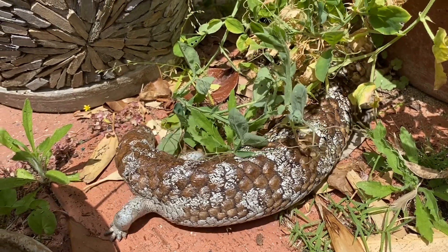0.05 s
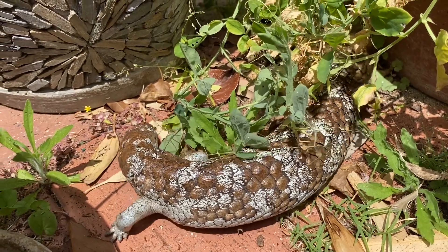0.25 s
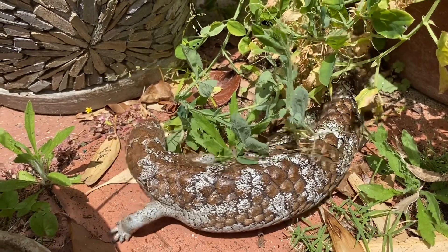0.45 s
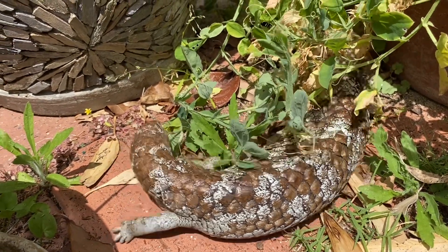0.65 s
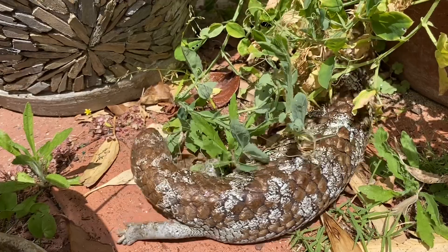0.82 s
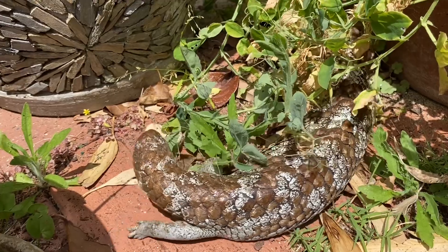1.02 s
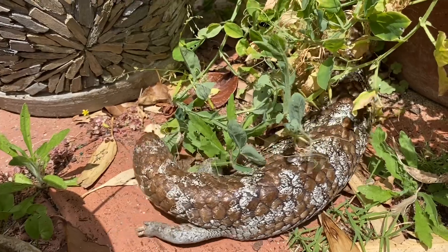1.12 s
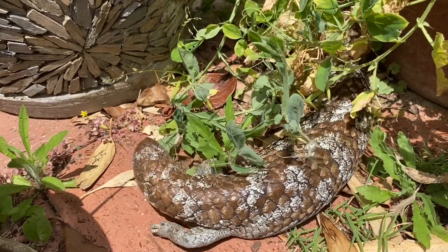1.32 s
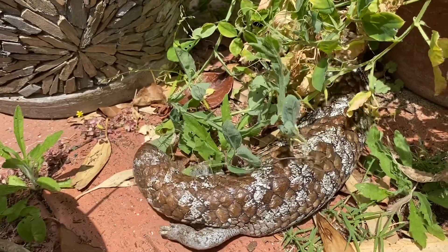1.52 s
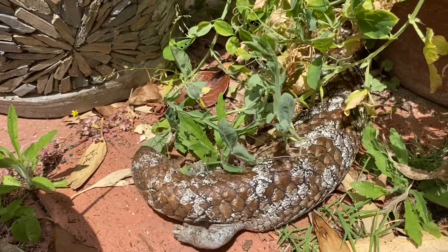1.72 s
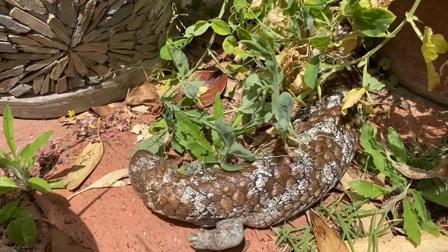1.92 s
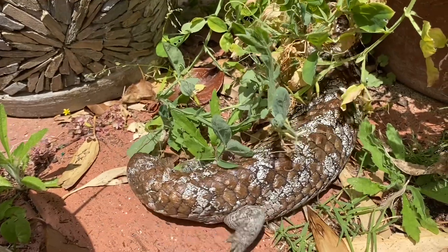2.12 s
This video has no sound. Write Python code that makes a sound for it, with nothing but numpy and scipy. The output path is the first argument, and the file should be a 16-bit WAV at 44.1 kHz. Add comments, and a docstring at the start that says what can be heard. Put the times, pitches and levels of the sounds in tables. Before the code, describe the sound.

Dry leaves and twigs crackle close by under a crawling lizard. Sharp little snaps begin at 0.1 seconds and are thickest and loudest from 0.3 to 0.7. A lighter flurry comes around 1.2 seconds, then scattered ticks and faint claw scuffs continue until about 2.1. Throughout, its belly slides over paving with a soft gritty hiss and a faint hollow scrape, above a quiet outdoor rumble.

```python
"""A lizard in dry leaves

A heavy lizard drags itself over paving into dry leaves and plants, close to two small microphones.
Leaves and twigs snap under it in two flurries, and its claws scuff. Its scaly belly slides with a
gritty hiss, and its weight makes a hollow scrape. A quiet outdoor rumble lies underneath."""
import sys
import numpy as np
from scipy import signal
from scipy.fft import rfft, irfft
from scipy.io import wavfile
from scipy.ndimage import uniform_filter1d

SR = 44100
rng = np.random.default_rng(int(sys.argv[2]) if len(sys.argv) > 2 else 0)


def persist_wave(psi):
    """Save psi, clipped to +-1, as 16-bit WAV."""
    counts = np.round(np.clip(psi, -1, 1) * 32767).astype(np.int16)
    wavfile.write(sys.argv[1], SR, np.atleast_2d(counts).T)


N = 94815

# Leaves and twigs snapping. Each row: start in seconds; level, knock, treble and highest treble in
# relative dB; ring pitch in Hz; ring boost in dB (none if below zero); fade time in seconds.
LEAF_SNAPS = [(0.0924, -31, -16, -0.5, -2.5, 7400, 6.5, 0.00062), (0.1203, -41, -4, -9, 4, 5082, 8, 0.0022),
              (0.15, -46, -10, 9, 3.1, 4264, 2, 0.0034), (0.1707, -37, -3, 7, -2, 6675, -3, 0.0017),
              (0.18, -39, 1, 6, 2, 4910, -4, 0.0011), (0.2047, -43, -6, 5.4, 3, 7192, 3, 0.0017),
              (0.2297, -29, -17, 0, -2.5, 6500, 6.5, 0.0012),
              (0.2961, -18.5, -14, -4, 2, 3080, 6.5, 0.0009),
              (0.3233, -22.5, -13, 5.5, -11, 3020, 15, 0.00086),
              (0.343, -33, -22, 7.5, 10, 5599, 4, 0.00067), (0.3604, -40.5, -19, 8, -5.5, 6503, 11, 0.0015),
              (0.38, -40, -9, 4, 3, 3575, 9, 0.0024), (0.412, -27, -22.9, 8.5, 0.5, 7000, 10, 0.002),
              (0.4291, -24.5, -19, 7, -5, 2960, 4.5, 0.0012),
              (0.4514, -29.5, -21, -3, 4.0, 6600, 11.5, 0.0035),
              (0.457, -26, -15.5, 11, 4, 6200, 7.5, 0.0013), (0.4657, -37.5, -16, 8, 6, 4522, 11, 0.001),
              (0.4714, -37, -23, 20, -2, 4530, 11, 0.001), (0.497, -34.5, -12, 5, 0, 5070, 4, 0.0012),
              (0.508, -21, -24, 10, 0.1, 5660, 7, 0.00093),
              (0.514, -22.5, -11, 11.5, 2.5, 4750, 10.5, 0.0018),
              (0.611, -42, -17, 6, -2, 5000, 11, 0.0016), (0.6237, -25, -21, 7.5, 3, 6900, 5, 0.0013),
              (0.6352, -27.5, -3, 16.5, -14, 4670, 8, 0.0024), (0.658, -39.5, -23, 2, 14, 6600, 18, 0.002),
              (0.6653, -29, -25, -4, -8, 5870, 13, 0.0007), (0.6856, -42.0, 8, 13.5, 9, 5750, 18, 0.0018),
              (0.7435, -41.5, 8.5, 8, -1.9, 4910, 8.5, 0.0029), (0.951, -36.5, 0, -1, 3, 5300, 2, 0.0017),
              (1.1371, -29.5, -2, -2, 4.5, 1560, 3, 0.002), (1.17, -31, -13, 2, -4, 7460, 13, 0.0043),
              (1.1727, -25.5, -22, 8, -2, 5270, 3.5, 0.00072),
              (1.2021, -27, -4.5, 8.5, 1, 4980, 10, 0.0019), (1.236, -35.5, -3.5, 3, 10, 5900, 12, 0.0022),
              (1.311, -35, -6.5, 4, 2, 6300, 5.5, 0.0026), (1.4166, -39, -5, 0, -8.5, 3800, 11.5, 0.004),
              (1.5169, -35.5, -3.5, 5, 7, 4670, 11, 0.004), (1.6047, -42.5, -1.5, 7, 9, 3790, 11, 0.0035),
              (1.757, -44, -2, 15, 11, 6546, 14, 0.002), (1.7735, -34.5, -1.5, 2, 2.2, 5039, -2, 0.0012),
              (1.816, -43.5, 4.5, 12, 10, 5440, 11.5, 0.0013), (1.975, -44, -3.0, 8, -2, 3790, 9, 0.002),
              (2.007, -45, -3, 8, -6, 4134, 11, 0.00099), (2.1257, -39.5, -11, 5.5, 5.2, 5800, 3, 0.002)]
# Claws and scales scuffing. Each row: start and length in seconds; level, knock, treble and
# highest treble in relative dB.
CLAW_SCUFFS = [(0.27, 0.013, -43, -2.5, 1, 2), (0.633, 0.01, -43.5, -0.5, 7, 2),
               (0.869, 0.0072, -43.5, -3.5, -0.5, 2), (1.283, 0.0054, -47, -7, 1, 3),
               (1.413, 0.0044, -48, 3, 2, 4), (1.493, 0.0092, -45, -1.5, -10, -10),
               (1.715, 0.015, -53, 5, 2, 6), (1.737, 0.0049, -57.5, 7, 16, 12),
               (1.758, 0.0087, -51.5, -1, 6, 8.0), (1.87, 0.011, -44.5, -1, 2, 9),
               (1.883, 0.0062, -41.5, -8, 4, 3), (1.892, 0.011, -47.5, -9, -3.6, -3)]
# The tone that snaps and scuffs share. Each row: pitch in Hz, level in dB.
CRACK_TONE = [(100, -23.5), (300, -6), (600, 3.5), (950, -2), (1550, 1.5), (2300, -1.5), (2650, -5.5),
              (3100, -2.5), (5000, 0.5), (8000, -0.5), (12000, 1), (15000, 5.5), (16500, -3)]
# Pitches that stand out in the snaps, scuffs and hiss, early and late in the crawl.
# Each row: pitch in Hz, relative strength in dB.
FIRST_FLURRY_PEAKS = [(2300, 5), (3060, 8), (3500, 6.5), (4500, 7.5), (5070, 6.5), (5700, -0.5), (6180, 8),
                      (6600, 4), (7200, 5.5), (7550, 7.5), (10100, 5), (10600, 5.5), (11700, 4.5),
                      (14300, 4)]
SECOND_FLURRY_PEAKS = [(1580, 6), (2200, 3.5), (3150, 3), (3850, 4), (4350, 2), (5000, 7.5), (6050, 4.5),
                       (7520, 6), (8150, 3.5), (11400, 5), (14500, 3)]
LATE_HISS_PEAKS = [(3150, 5.5), (3550, 6), (4550, 6), (5000, 5.5), (6800, 5.5), (7500, 7), (10600, 5),
                   (11600, 2), (14600, 11)]
# The belly sliding. Each row: time in seconds, then level and brightness in relative dB.
BELLY_PUSH = [(0, -63.5, 2), (0.06, -63, -17), (0.12, -54, -9), (0.19, -51, -4.5), (0.32, -49, -12.5),
              (0.4, -51, -8.5), (0.54, -49, -7.5), (0.64, -44, -4), (0.72, -49.5, -6.5),
              (0.82, -52.5, -7.6), (0.9, -48.5, -10.5), (1.03, -49.5, -6.5), (1.13, -50.5, -9),
              (1.26, -52, -7), (1.47, -49, -7), (1.65, -52, -6), (1.72, -53, -3.5), (1.83, -57, -6),
              (1.94, -57.5, -6), (2.06, -54, -6.5), (2.15, -53, -11)]
# The body dragging on paving. Each row: time in seconds, scrape level in dB, scrape pitch in Hz,
# shuffle level in dB.
BODY_DRAG = [(0.1, -84, 1750, -87), (0.52, -67.5, 1750, -67), (0.66, -65, 1730, -61),
             (0.8, -76, 1770, -67.5), (0.94, -71, 1800, -74), (1.2, -72, 1620, -91),
             (1.45, -66.5, 1620, -68), (1.7, -66, 1550, -72.5), (1.85, -75, 1540, -77),
             (2.1, -71.5, 1580, -76)]
# The tones of the belly's hiss, the body's shuffle and the outdoor background.
# Each row: pitch in Hz, relative level in dB.
HISS_TONE = [(150, -14), (400, -8.5), (900, -6.5), (1600, -3.5), (2100, -5.5), (2750, -5.5), (3200, -0.5),
             (4100, 3.5), (4800, 2.5), (6200, 5), (8200, -0.5), (10000, 1), (11800, 0), (14500, -2),
             (16000, -6.5)]
SHUFFLE_TONE = [(40, -15), (100, 8), (280, 0), (420, -1), (680, 0), (950, -17), (2000, -36)]
AIR_TONE = [(15, -26), (30, -21), (45, -9), (65, 0.5), (85, -4.5), (110, -3.5), (150, -11), (250, -14),
            (400, -21), (900, -25.5), (1600, -27.5), (3000, -29.5), (8000, -40), (16000, -32.5)]
# How alike the two microphones sound. Each row: pitch in Hz, likeness from 0 to 1.
MIC_LIKENESS = [(50, 0.99), (150, 0.93), (350, 0.7), (850, 0.2), (1600, 0.7), (2900, 0.73), (3700, .97),
                (5400, 0.75), (6800, 1), (8000, 1), (9100, 1), (10200, 1), (13200, 0.85), (15500, 1)]
# How much louder the left side is. Each row: pitch in Hz, left over right in dB.
MIC_BALANCE = [(100, 0), (600, 1), (1500, -0.5), (2900, 2), (4000, -0.5), (5100, 3.5), (6500, 0),
               (16000, 0)]
# Ringing in the left microphone's openings shifts its phase. Each row: pitch and width in Hz.
MIC_PORTS = [(9150, 2030), (13250, 2460)]

TONE_CHANGE_S = 0.8  # the early peaks give way to the late ones
HIGHEST_HZ = 15900


def snaps(size=2048):
    """A leaf or twig breaks: a very short crack, then a faint shiver."""
    out, t = np.zeros((2, N)), np.arange(size) / SR
    shiver = amp(-18.5) * np.exp(-t / 0.0059)
    for start, db, knock_db, treble_db, top_db, ring_hz, ring_db, fade_s in LEAF_SNAPS:
        rise_s = max(0.00028, 0.19 * fade_s)  # longer cracks take longer to build
        envelope = (1 - np.exp(-t / rise_s)) * (np.exp(-t / fade_s) + shiver)
        crack = crackle(start, envelope, knock_db, treble_db, top_db, ring_hz, ring_db)
        add(out, start, np.sqrt(0.001 * SR) * amp(db + 0.5) * crack)
    return out


def scuffs(size=2048):
    """A claw or scale gives a short rub that swells and fades."""
    out, t = np.zeros((2, N)), np.arange(size) / SR
    for start, length, db, knock_db, treble_db, top_db in CLAW_SCUFFS:
        envelope = np.sqrt(t / length) * np.exp(-1.3 * (t / length) ** 2)
        rub = crackle(start, envelope, knock_db, treble_db, top_db)
        add(out, start, np.sqrt(length * SR) * amp(db + 2.5) * rub)
    return out


def crackle(start, envelope, knock_db, treble_db, top_db, ring_hz=4000, ring_db=0):
    """A burst of tiny breaks in which some pitches stand out. Each has its own uneven tone."""
    size = len(envelope)
    hz = np.fft.rfftfreq(size, 1 / SR)
    tone = [(1680, knock_db), (2970, 0), (7050, 0), (9470, treble_db), (14300, top_db)]
    table, base_db = (FIRST_FLURRY_PEAKS, -4.5) if start < TONE_CHANGE_S else (SECOND_FLURRY_PEAKS, -3)
    boost = peaks(table, hz, width_hz=185) * peaks([(ring_hz, ring_db)], hz, width_hz=445)
    bumps = uniform_filter1d(rng.standard_normal(len(hz)), size=9)
    uneven_db = 2 * unit_level(uniform_filter1d(bumps, size=7))
    gain = boost * amp(look_up(CRACK_TONE, hz) + look_up(tone, hz) + base_db + uneven_db)
    # Build the filter so that its tail follows the hit (minimum phase).
    fold = irfft(np.log(gain), size)
    fold[1:size // 2] *= 2
    fold[size // 2 + 1:] = 0
    return irfft(rfft(tiny_breaks(envelope)) * np.exp(rfft(fold)), size)


def tiny_breaks(envelope):
    """Two bursts of noise, even across all pitches, whose loudness follows the envelope."""
    noise = rng.standard_normal((2, len(envelope))) * envelope
    for _ in range(3):
        spectrum = rfft(noise)
        noise = irfft(spectrum / (abs(spectrum) + 1e-12), len(envelope))
        power = abs(uniform_filter1d(noise ** 2, size=32, axis=1))
        noise *= envelope / np.sqrt(power + 1e-12)
    return noise / np.linalg.norm(noise, axis=1, keepdims=True)


def belly_slide(grains_per_s=700, grain_s=0.00055, blend_s=0.15):
    """Scales rub over grit and leaves: a grainy hiss whose tone shifts partway through."""
    t, hz = np.arange(N) / SR, np.fft.rfftfreq(N, 1 / SR)
    times, db, bright_db = np.transpose(BELLY_PUSH)
    sizes = uneven_sizes(N, spread_db=7.5) * (rng.random(N) < grains_per_s / SR)
    grain_power = signal.lfilter([1], [1, -np.exp(-2 / (grain_s * SR))], sizes ** 2)
    grains = unit_level(np.sqrt(grain_power))
    rub = rng.standard_normal((2, N)) * np.hypot(1, amp(-1.5) * grains)
    rub = unit_level(rub) + amp(-2.5) * grit()
    boosted = (irfft(rfft(rub) * peaks(table, hz, width_hz=140) ** 0.79, N)
               for table in (FIRST_FLURRY_PEAKS, LATE_HISS_PEAKS))
    early, late = (unit_level(shape_tone(x, HISS_TONE)) for x in boosted)
    blend = np.clip((t - TONE_CHANGE_S) / blend_s + 0.5, 0, 1)
    hiss = (1 - blend) * early + blend * late
    treble = shape_tone(hiss, [(7000, -39), (10000, -1), (12500, 5.5)])
    extra_treble = amp(np.interp(t, times, bright_db) + 8) - 1  # none at a brightness of -8
    return amp(np.interp(t, times, db) - 2) * (hiss + treble * extra_treble)


def grit(pitches=48, chances=2048, ticks_per_s=5000, ring_s=0.0016):
    """Countless crumbs and leaf edges tick at many different pitches."""
    out, fade = np.zeros((2, N)), np.exp(-1 / (ring_s * SR))
    for hz in (np.arange(pitches) + rng.random(pitches)) * HIGHEST_HZ / pitches:
        angle = 2 * np.pi * hz / SR
        ticks = np.zeros((2, N))
        strength = uneven_sizes(chances, spread_db=3.5)
        happens = rng.random(chances) < ticks_per_s * N / SR / pitches / chances
        ticks[:, rng.integers(0, N, chances)] = strength * happens * rng.choice([-1, 1], (2, chances))
        out += signal.lfilter([np.sin(angle)], [1, -2 * fade * np.cos(angle), fade ** 2], ticks + 1e-18)
    return unit_level(out)


def body_drag(catches_per_s=600, width_hz=440):
    """The heavy body catches on the paving: a hollow scrape of drifting pitch, and a dull shuffle."""
    times, *columns = np.transpose(BODY_DRAG)
    scrape_db, scrape_hz, shuffle_db = (np.interp(np.arange(N) / SR, times, c) for c in columns)
    catches = rng.standard_normal((2, N)) * (rng.random(N) < catches_per_s / SR)
    # Each catch rings briefly at the scrape's current pitch.
    wave = np.exp(2j * np.pi * np.cumsum(scrape_hz) / SR)
    fade = np.exp(-np.pi * width_hz / SR)
    scrape = (wave * signal.lfilter([1], [1, -2 * fade, fade ** 2], catches / wave)).real
    shuffle = shape_tone(rng.standard_normal((2, N)), SHUFFLE_TONE)
    return amp(scrape_db) * unit_level(scrape) + amp(shuffle_db) * unit_level(shuffle)


def garden_echo(sound, size=8192, echo_db=-20, echo_s=0.14):
    """Paving and pots send back a short, faint echo."""
    t = np.arange(size) / SR
    tail = rng.standard_normal((2, size)) * amp(-60 * t / echo_s) * (t > 0.003)
    tail /= np.linalg.norm(tail[0])
    return sound + amp(echo_db) * signal.fftconvolve(sound, tail, axes=1)[:, :N]


def outdoor_air():
    """A steady, distant rumble with a faint hiss."""
    return amp(-56.5) * unit_level(shape_tone(rng.standard_normal((2, N)), AIR_TONE))


def microphones(sound):
    """Two close microphones hear nearly the same thing, apart from level and phase (wave timing)."""
    hz = np.fft.rfftfreq(N, 1 / SR)
    shared, apart = rfft(sound)
    likeness = look_up(MIC_LIKENESS, hz)
    shared *= np.sqrt((1 + likeness) / 2)
    apart *= np.sqrt((1 - likeness) / 2)
    phase = sum(np.pi * (1 + np.tanh((hz - pitch) / (0.92 * width))) for pitch, width in MIC_PORTS)
    lean = amp(look_up(MIC_BALANCE, hz) / 2)
    left = (shared + apart) * lean * np.exp(-1j * phase)
    right = (shared - apart) / lean
    return irfft(np.array([left, right]), N)


def amp(db):
    """Turns decibels into a number to multiply by."""
    return 10 ** (np.asarray(db) / 20)


def unit_level(x):
    """Scales a signal to an average (rms) level of one."""
    return x / np.sqrt(np.mean(x ** 2) + 1e-20)


def uneven_sizes(count, spread_db):
    """Random strengths: many small, a few large."""
    return amp(spread_db * np.minimum(rng.exponential(1, count), 3))


def look_up(table, hz):
    """Reads a table at any pitch, gliding between its rows."""
    pitches, values = np.transpose(table)
    return np.interp(np.log(hz + 1), np.log(pitches), values)


def shape_tone(x, table):
    """Turns each pitch up or down by the table's dB."""
    return irfft(rfft(x) * amp(look_up(table, np.fft.rfftfreq(N, 1 / SR))), N)


def peaks(table, hz, width_hz):
    """A boost around each pitch in the table."""
    return np.sqrt(1 + sum((amp(max(db, 0)) ** 2 - 1) / (1 + ((hz - pitch) / width_hz) ** 2) ** 2
                           for pitch, db in table))


def add(mix, start, sound):
    """Mixes a sound in at a start time in seconds."""
    part = mix[:, max(round(start * SR), 0):][:, :sound.shape[1]]
    part += sound[:, :part.shape[1]]


def scene():
    """The lizard in the leaves, over the outdoor background."""
    return microphones(garden_echo(snaps() + scuffs()) + belly_slide() + body_drag() + outdoor_air())


def record(dry):
    """Cuts away the very highest treble."""
    low_pass = signal.firwin(255, HIGHEST_HZ, window=("kaiser", 8), fs=SR)
    return signal.oaconvolve(dry, low_pass[None], "same", axes=1)


dry = scene()
out = record(dry)
persist_wave(out)
```